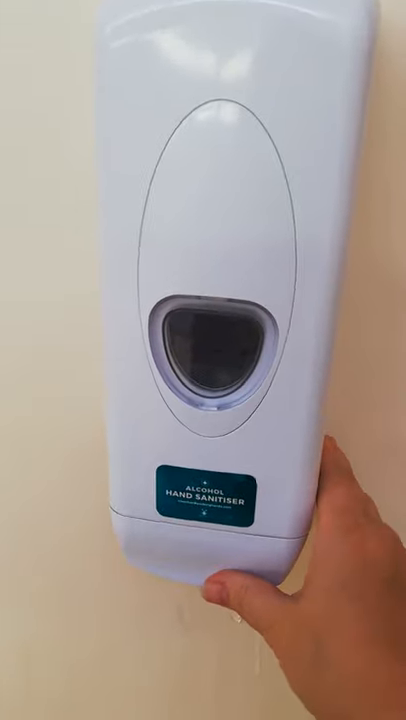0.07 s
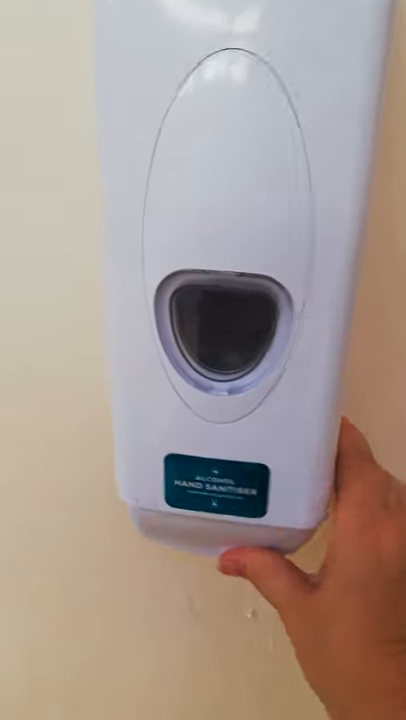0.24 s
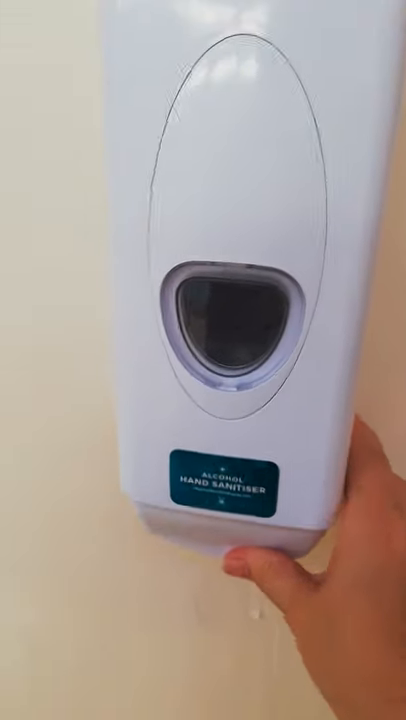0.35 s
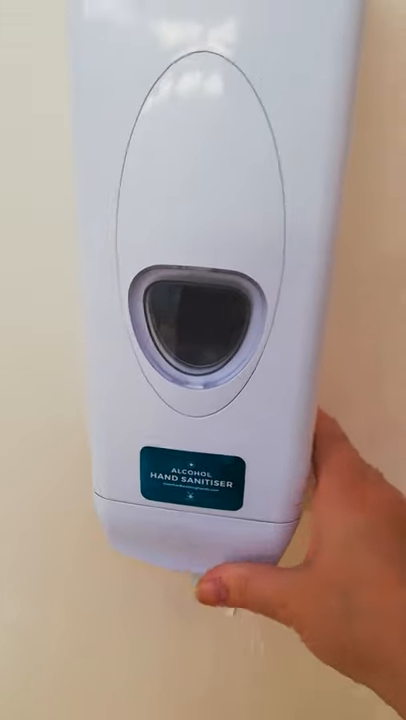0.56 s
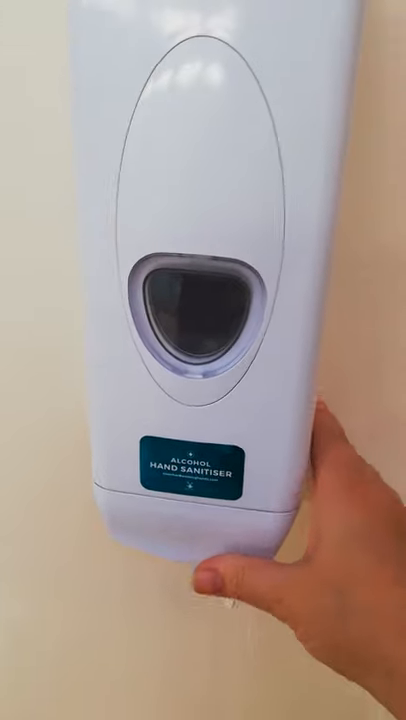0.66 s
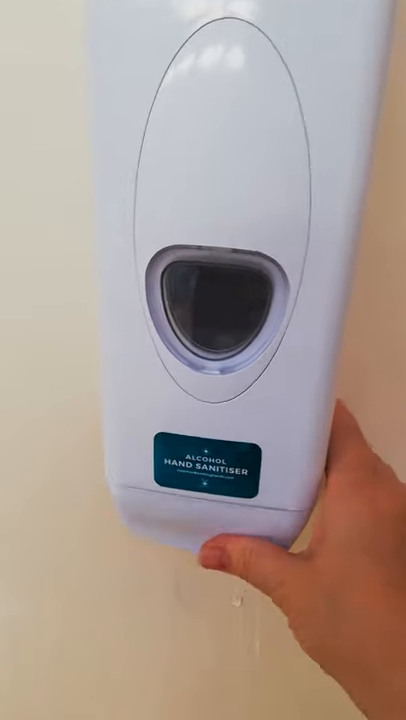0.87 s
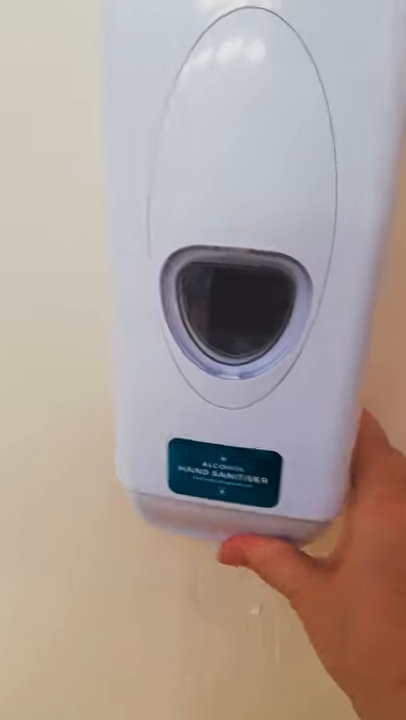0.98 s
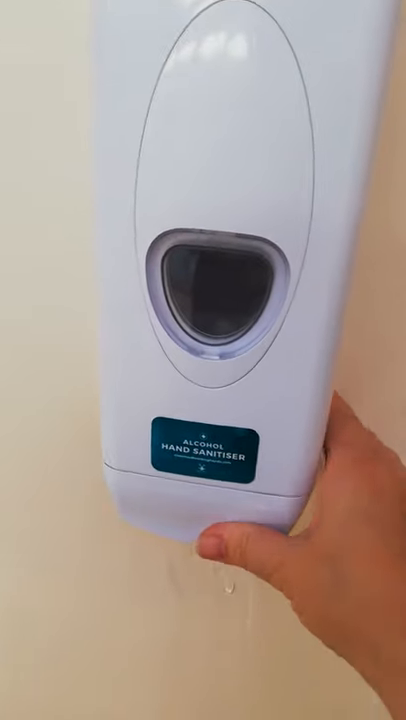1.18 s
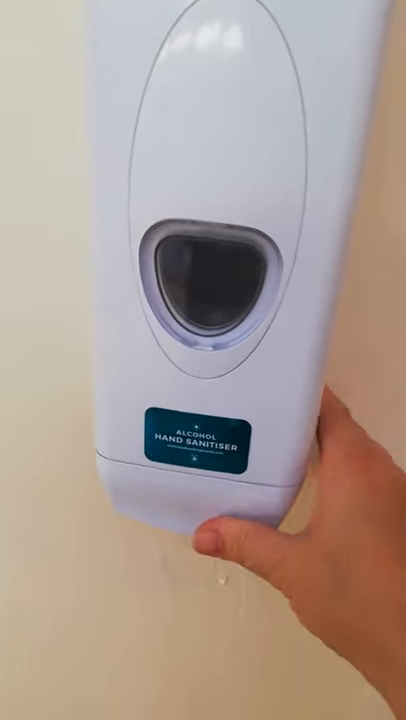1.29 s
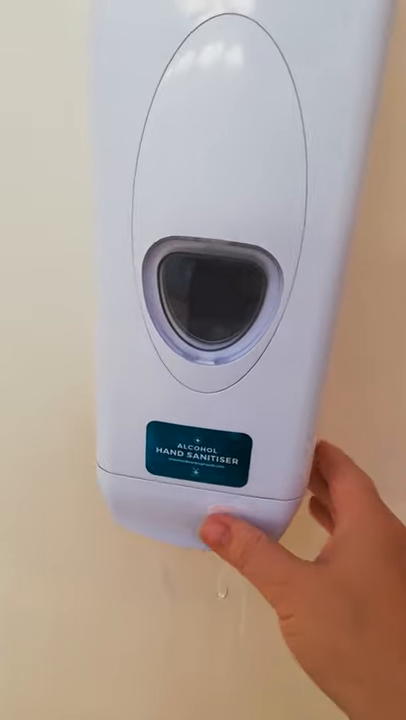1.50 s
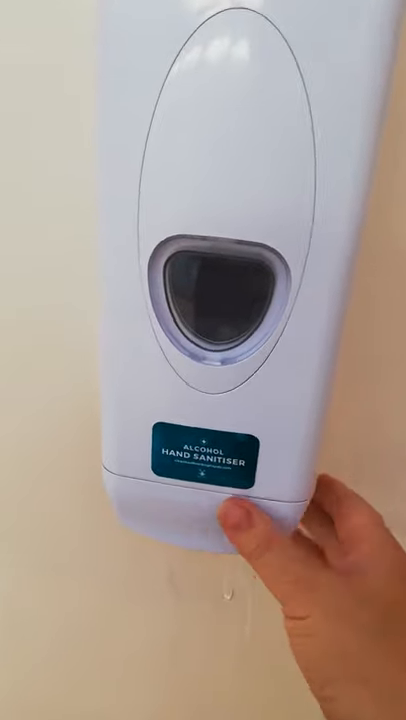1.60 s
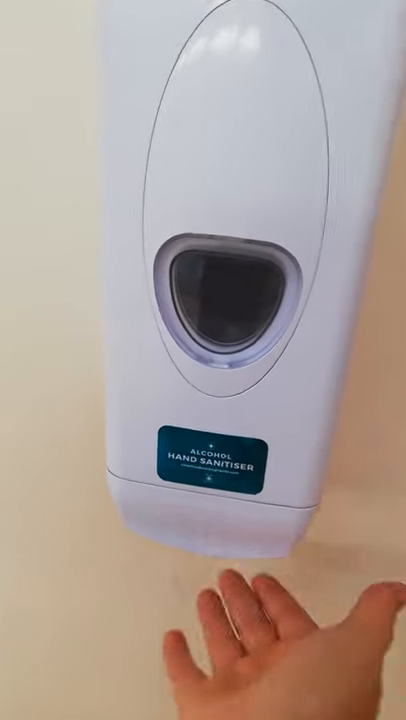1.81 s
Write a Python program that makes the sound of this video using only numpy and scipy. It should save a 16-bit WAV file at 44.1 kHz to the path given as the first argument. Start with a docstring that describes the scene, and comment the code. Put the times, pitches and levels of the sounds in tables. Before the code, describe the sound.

A wall dispenser of hand sanitiser is pumped twice, close by in a small quiet room. Each press gives hollow plastic knocks and a short wet squirt, then the lever clacks back. A hand faintly brushes away.

```python
"""Hollow plastic knocks and a short wet squirt: a wall dispenser of hand sanitiser is pumped twice,
close by in a small quiet room. Each press excites the modes of the housing, forces liquid and air
through the nozzle and bottoms out; the sprung lever then rubs back and clacks on its rest.
The dragging plunger makes the housing hum, and at the end the hand brushes away.
The room reverberates softly over faint ventilation."""
import sys
import numpy as np
from scipy import signal
from scipy.fft import rfft, irfft, next_fast_len
from scipy.io import wavfile

SR = 44100
rng = np.random.default_rng(int(sys.argv[2]) if len(sys.argv) > 2 else 0)


def generate_wav(sig):
    """Save sig (samples, or channels by samples) to the path in sys.argv[1] as 16-bit PCM at SR."""
    pcm = np.round(np.clip(np.atleast_2d(sig).T, -1, 1) * 32767).astype(np.int16)
    wavfile.write(sys.argv[1], SR, pcm)


N = 81585

# Modes of the plastic housing. Each row: frequency in Hz, bandwidth in Hz, level in dB.
HOUSING_MODES = [(629, 31, -4.5), (1154, 69, 1), (1460, 45, -4), (1605, 43, -8)]
# Bright spectrum of spray and snaps. Each row: frequency in Hz, level in dB.
BRIGHT_SPECTRUM = [(1000, -25), (3000, -39), (3900, -4.5), (5000, 2), (6800, 0), (8800, 7), (10500, 1.5),
                   (13000, -5.5), (16000, -18)]
CLICK_ATTACK_S = 0.00025


def lever_knocks():
    """Impact excitation: each contact gives a damped thump and a noisy clack, duller when it is soft."""
    # Each row: start in seconds, thump level in dB, thump pitch in Hz, clack level in dB,
    # clack T60 in seconds, clack cutoff in Hz.
    contacts = [(0.116, -42, 265.5, -57, 0.038, 900), (0.151, -44, 277, -55, 0.026, 5080),
                (0.2056, -21.5, 288, -30.5, 0.062, 12000), (0.2271, -26, 267, -26.5, 0.1, 9100),
                (0.277, -21, 280.3, -24.5, 0.094, 8000), (0.4607, -33.5, 267, -30, 0.14, 6000),
                (0.512, -31.5, 233, -23.5, 0.085, 5700), (0.548, -56, 254, -38.5, 0.056, 2930),
                (0.8621, -43, 280, -48, 0.33, 5130), (0.904, -19.5, 298.3, -29.5, 0.13, 3740),
                (0.9713, -25.5, 292.3, -25, 0.093, 12000), (1.166, -36, 280, -37, 0.058, 25000),
                (1.1997, -57, 258, -28, 0.042, 12000), (1.2051, -46, 250, -27, 0.064, 16000),
                (1.2139, -32, 256, -27.5, 0.062, 10100), (1.228, -45, 270, -29, 0.086, 4950)]
    # Each row: frequency in Hz, level in dB.
    clack_spectrum = [(60, -41), (160, -6.5), (400, 3.5), (760, 6), (950, -2), (1200, -3.5), (2300, -5.5),
                      (3900, -18.5), (9500, -14), (16000, -17)]
    thumps, clacks = np.zeros(N), np.zeros((2, N))
    for start, thump_db, hz, clack_db, clack_t60, cutoff_hz in contacts:
        tone = np.sin(2 * np.pi * hz * time_since(start))
        thumps += amp(thump_db) * decay(start, attack=0.00083, t60=0.11) * tone
        crack = filtered(near_noise(), lambda f: amp(along(clack_spectrum, f)) / (1 + (f / cutoff_hz)**2))
        clacks += amp(clack_db) * decay(start, CLICK_ATTACK_S, clack_t60) * unit(crack)
    return thumps, clacks


def housing_resonance(x):
    """Forced vibration: the housing adds the ring of its modes to whatever shakes it."""
    return x + 2 * amp(-4.5) * filtered(x, lambda f: modal_response(f, HOUSING_MODES))


def plunger_stops():
    """Free vibration: the plunger bottoms out and the housing modes decay in a hollow tock."""
    # Each row: start in seconds, level in dB.
    strikes = [(0.2734, -24.5), (0.9708, -21)]
    widest = max(width for _, width, _ in HOUSING_MODES)
    out = np.zeros(N)
    for start, db in strikes:
        t = np.maximum(time_since(start), 0)
        for hz, width, mode_db in HOUSING_MODES:
            out += amp(db + mode_db) * width / widest * np.exp(-np.pi * width * t) * np.sin(2 * np.pi * hz * t)
    return out


def lever_seats():
    """Cushioned impact: a soft stop excites only low modes, a housing clunk and a boom from the wall."""
    # Each row: middle in seconds, level in dB, clunk pitch in Hz.
    seatings = [(0.2808, -23.5, 386), (0.5184, -20, 259.6), (1.219, -20.5, 255.8)]
    boom_hz, boom_db = 102, -17.5
    out = np.zeros(N)
    for middle, db, hz in seatings:
        t = time_since(middle)
        ring = np.cos(2 * np.pi * hz * t) + amp(boom_db) * np.sin(2 * np.pi * boom_hz * t)
        out += swell(middle, half_length=0.0062, db=db) * ring
    return out


def nozzle_squirts():
    """Two-phase flow: liquid and air spit in tiny bursts, a bright spray just ahead of a gurgle."""
    # Each row: centre, rise and fall in seconds, then spray level and gurgle level in dB.
    squirts = [(0.275, 0.015, 0.011, -33.5, -32), (.966, 0.0067, 0.0081, -25.5, -25)]
    # Each row: frequency in Hz, level in dB.
    gurgle_spectrum = [(400, -21), (1150, 12.5), (1700, 1), (2050, 1.5), (3300, -3.5), (3850, -10.5),
                       (8000, -37)]
    bursts_per_s, burst_share, gurgle_lag_s = 5500, 0.26, 0.0019
    onsets = rng.random(N) < bursts_per_s / SR
    signs = np.sign(rng.standard_normal(N))
    sizes = np.exp(0.25 * rng.standard_normal(N))
    spit = np.sqrt(burst_share) * unit(onsets * signs * sizes) + np.sqrt(1 - burst_share) * near_noise()
    fine = coloured(spit, BRIGHT_SPECTRUM)
    coarse = coloured(chamber_resonance(spit), gurgle_spectrum)
    spray, gurgle = np.zeros((2, 2, N))
    for centre, rise, fall, spray_db, gurgle_db in squirts:
        flow = lambda t: 2 / (np.exp(np.minimum(-t / rise, 20)) + np.exp(np.minimum(t / fall, 20)))
        spray += amp(spray_db) * flow(time_since(centre)) * fine
        gurgle += amp(gurgle_db) * flow(time_since(centre + gurgle_lag_s)) * coarse
    return spray, gurgle


def chamber_resonance(x):
    """Cavity resonance: the hollow pump chamber colours the sound passing through; some bypasses it."""
    # Each row: frequency in Hz, bandwidth in Hz, level in dB.
    cavity_modes = [(1667, 105, -5), (2365, 116, -1), (2806, 56, 3.5), (3150, 206, 4)]
    return filtered(x, lambda f: amp(-12) + modal_response(f, cavity_modes))


def valve_snaps():
    """Damped oscillation: the small, stiff valve and spring click with a high ring that chirps upward."""
    # Each row: start in seconds, level in dB, pitch in Hz, T60 in seconds, relative crack level in dB.
    snaps = [(0.2896, -10.5, 3190, 0.0095, -9), (0.4123, -26, 9800, 0.013, -5),
             (.9045, -37.5, 7890, 0.02, -4), (0.91, -45.5, 7860, 0.023, 7.5),
             (1.138, -35.5, 9450, 0.083, -11.5)]
    flat_share, chirp_s = 0.317, 0.00078  # the ring starts flat and rises to its pitch
    out = np.zeros((2, N))
    for start, db, hz, t60, crack_db in snaps:
        t = np.maximum(time_since(start), 0)
        cycles = hz * (t - flat_share * chirp_s * (1 - np.exp(-t / chirp_s)))
        ring = np.sin(2 * np.pi * cycles + 0.95 * wobble(bandwidth_hz=460))
        crack = amp(crack_db) * coloured(near_noise(), BRIGHT_SPECTRUM)
        out += amp(db) * decay(start, CLICK_ATTACK_S, t60) * (ring + crack)
    return out


def housing_hums():
    """Frictional excitation: the plunger drives low modes unevenly; they sink as the drag eases."""
    # Each row: middle and half length in seconds, pitch in Hz, level in dB, relative upper mode in dB.
    drags = [(0.24, 0.01, 260, -25, -16), (0.453, 0.01, 253, -34.5, -8), (0.928, 0.021, 291.6, -26, -21),
             (1.016, 0.019, 274.8, -25, -2.5), (1.145, 0.0087, 262, -30, -32)]
    upper_hz, wall_hz, wall_db, sag_hz_per_s = 649, 148.3, -17, 460
    out = np.zeros(N)
    for middle, half_length, pitch, db, upper_db in drags:
        t = time_since(middle)
        modes = [(pitch, 0, 0.3), (upper_hz, upper_db, 0.46), (wall_hz, wall_db, 0.3)]
        for hz, mode_db, jitter_rad in modes:
            phase = 2 * np.pi * (hz - sag_hz_per_s * t / 2) * t + jitter_rad * wobble(bandwidth_hz=131)
            out += swell(middle, half_length, db + mode_db) * np.sin(phase)
    return out


def lever_rubs():
    """Sliding friction: soft noise swells while the plastic lever moves along its guide."""
    # Each row: middle in seconds, half length in seconds, level in dB.
    slides = [(0.362, 0.24, -50), (0.5, 0.039, -45.5), (.94, 0.011, -36), (1.167, 0.1, -42.5)]
    # Each row: frequency in Hz, level in dB.
    friction_spectrum = [(100, -7), (300, 2), (800, -8), (1500, -14.5), (3200, -18), (4000, -21.5),
                         (7000, -27), (9600, -16), (16000, -36)]
    return coloured(near_noise(), friction_spectrum) * sum(swell(*slide) for slide in slides)


def hand_brushes():
    """Light friction: a thin, high band of noise as the hand slides off the lever."""
    # Each row: middle in seconds, half length in seconds, level in dB.
    strokes = [(1.704, 0.0071, -50), (1.81, 0.18, -62)]
    rustle = filtered(near_noise(), lambda f: resonance(f, hz=10400, width=4600) ** 2)
    return unit(rustle) * sum(swell(*stroke) for stroke in strokes)


def reverberation(x):
    """Convolution with the room's diffuse tail, in which each frequency decays at its own rate."""
    # Each row: frequency in Hz, T60 in seconds.
    decay_times = [(100, 1), (280, 0.94), (700, 0.52), (3000, 0.69), (10000, 0.68), (16000, 0.63)]
    build_s = 0.0013
    hz, t, bands = signal.stft(diffuse_noise()[:, :SR], SR, nperseg=256)
    envelope = np.exp(-np.log(1000) * t / along(decay_times, hz)[:, None]) * (1 - np.exp(-t / build_s))
    _, tail = signal.istft(bands * envelope, SR, nperseg=256)
    return signal.fftconvolve(x, tail / np.linalg.norm(tail[0]), axes=1)[:, :N]


def room_air():
    """Ambient noise: air and faint ventilation form a steady diffuse field."""
    # Each row: frequency in Hz, level in dB.
    air_spectrum = [(25, -2.5), (48, 0.5), (100, -6.5), (250, -6), (620, -8), (845, 1.5), (1020, -8),
                    (2300, -20), (7000, -23.5), (10000, -22), (16000, -36)]
    return amp(-55.5) * coloured(diffuse_noise(), air_spectrum)


def near_noise():
    """Partial coherence: two microphones share the bass of a close noise but little of its treble."""
    white = rng.standard_normal((3, N))
    unshared = lambda f: 0.92 * f ** 2 / (f ** 2 + 500 ** 2)  # power fraction, rising around 500 Hz
    common = filtered(white[0], lambda f: np.sqrt(1 - unshared(f)))
    return common + filtered(white[1:], lambda f: np.sqrt(unshared(f)))


def diffuse_noise():
    """Diffuse field: sound from all around is alike at two microphones only at long wavelengths."""
    # Each row: frequency in Hz, left-right coherence from 0 to 1.
    coherence = [(110, 0.99), (280, 0.84), (600, 0.17), (10000, 0.043)]
    angle = lambda f: np.arccos(along(coherence, f)) / 2
    mid, side = filtered(rng.standard_normal((2, N)), lambda f: np.array([np.cos(angle(f)), np.sin(angle(f))]))
    return np.array([mid + side, mid - side])


def amp(db):
    """Decibels to amplitude ratio."""
    return 10 ** (np.asarray(db) / 20)


def unit(x):
    """Normalisation to rms 1."""
    return x / np.sqrt(np.mean(x ** 2) + 1e-20)


def along(points, hz):
    """Interpolation of (Hz, value) points on a logarithmic frequency axis."""
    f, values = np.transpose(points)
    return np.interp(np.log(hz + 1), np.log(f + 1), values)


def filtered(x, response):
    """Linear filtering: the spectrum of x times a frequency response."""
    size = next_fast_len(N + SR // 4)
    return irfft(rfft(x, size) * response(np.fft.rfftfreq(size, 1 / SR)), size)[..., :N]


def coloured(x, spectrum):
    """Spectral shaping by (Hz, dB) points, at rms 1."""
    return unit(filtered(x, lambda f: amp(along(spectrum, f))))


def resonance(f, hz, width):
    """Band-pass response of a damped oscillator."""
    return 1j * f * width / (hz * hz - f * f + 1j * f * width)


def modal_response(f, modes):
    """Superposition of resonances."""
    return sum(amp(db) * resonance(f, hz, width) for hz, width, db in modes)


def time_since(start):
    """Seconds since start, negative before it."""
    return np.arange(N) / SR - start


def decay(start, attack, t60):
    """Envelope of a blow: a quick rise, then exponential decay by 60 dB in t60 seconds."""
    t = np.maximum(time_since(start), 0)
    return (1 - np.exp(-t / attack)) * np.exp(-np.log(1000) * t / t60)


def swell(middle, half_length, db):
    """Gaussian envelope peaking at db."""
    return amp(db) * np.exp(-(time_since(middle) / half_length) ** 2)


def wobble(bandwidth_hz):
    """Random modulation: low-passed noise of rms 1."""
    return unit(filtered(rng.standard_normal(N), lambda f: np.exp(-(f / bandwidth_hz) ** 2)))


def scene():
    """Superposition of the dispenser's direct sound, its reverberation and the room air."""
    thumps, clacks = lever_knocks()
    spray, gurgle = nozzle_squirts()
    low = thumps + housing_hums() + lever_seats()
    high = housing_resonance(clacks + lever_rubs()) + spray + hand_brushes()
    pump = valve_snaps() + plunger_stops() + gurgle
    # Pump sounds face forward and reach the room less.
    tail = reverberation(amp(-13.5) * low + amp(-14.5) * high + amp(-15.5) * pump)
    return low + high + pump + tail + room_air()


def record(dry):
    """Level and phase differences: the left channel is duller and out of step; both are band-limited."""
    # Left microphone. Each row: frequency in Hz, gain in dB.
    left_gain = [(100, 0), (280, -1), (600, -2.5), (1200, -4), (3000, 0), (9000, -1.5), (12500, -3.5)]
    # Its phase below split_hz. Each row: frequency in Hz, lead in radians.
    left_lead = [(340, 0.06), (570, 2.5), (1050, 1.33), (2000, -.5), (3300, -0.5)]
    split_hz, treble_lag_s, top_hz = 3700, 0.00061, 16000
    phase = lambda f: np.where(f > split_hz, -2 * np.pi * f * treble_lag_s, along(left_lead, f))
    left = lambda f: amp(along(left_gain, f)) * np.exp(1j * phase(f))
    return filtered(dry, lambda f: np.array([left(f), np.ones_like(f)]) * (f < top_hz))


dry = scene()
out = record(dry)
generate_wav(out)
```